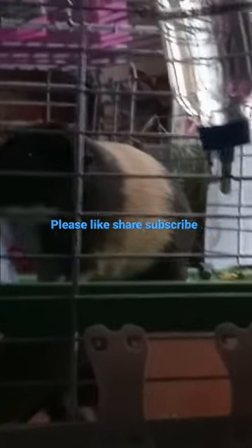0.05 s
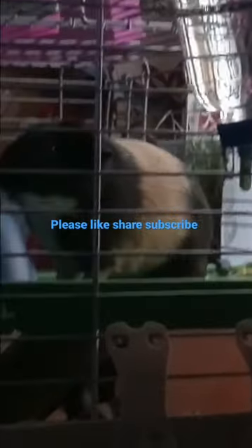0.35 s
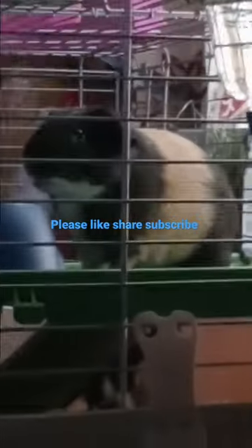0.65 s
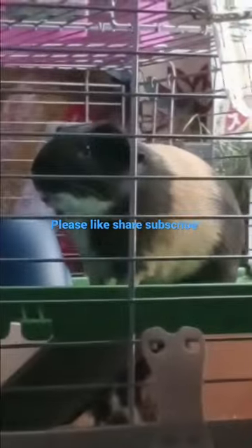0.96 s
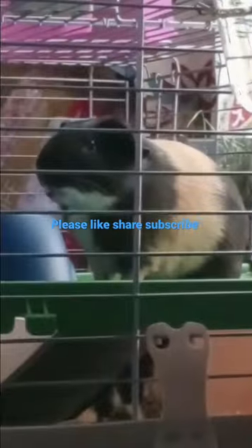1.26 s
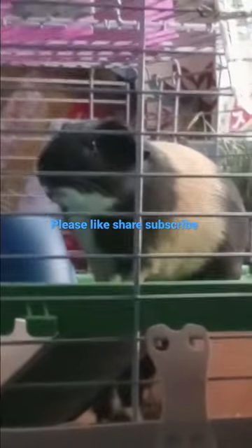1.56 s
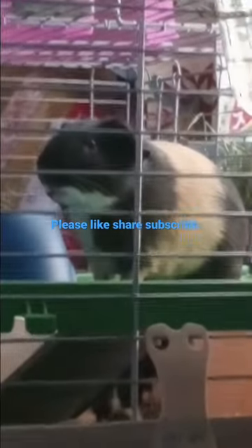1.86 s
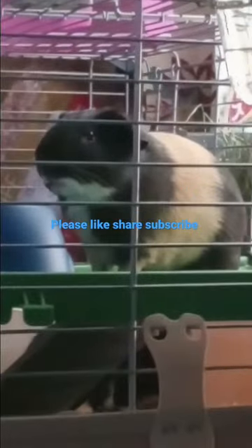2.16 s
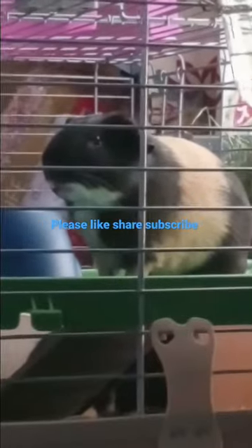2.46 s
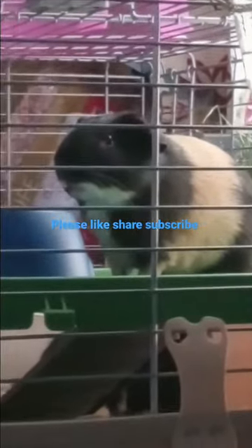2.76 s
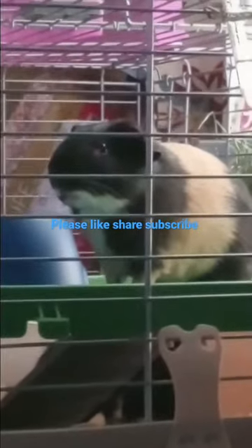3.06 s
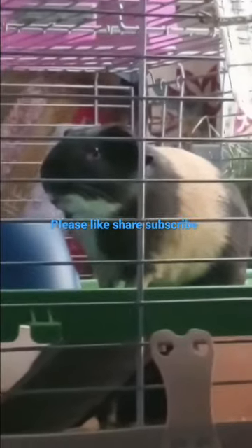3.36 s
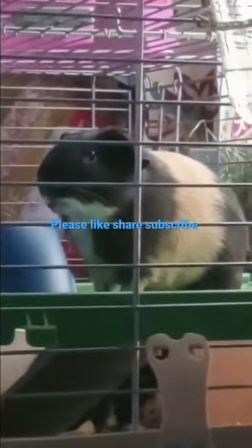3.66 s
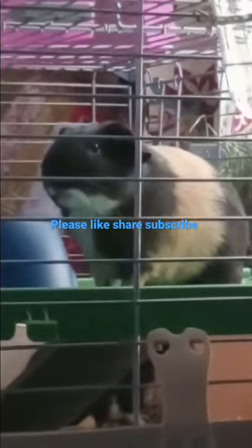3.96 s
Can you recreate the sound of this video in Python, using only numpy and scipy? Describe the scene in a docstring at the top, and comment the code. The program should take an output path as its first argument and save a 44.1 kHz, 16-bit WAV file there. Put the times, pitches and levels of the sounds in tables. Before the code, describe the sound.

A guinea pig squeals sharply and goes on squeaking quietly in a small room. Quick, ringing cage clacks and a light rustle sound close by, then stop, leaving fading squeaks and a few soft microphone bumps.

```python
"""A guinea pig in a wire cage in a small room: one loud squeal, then soft rising squeaks that die away.
Each call is a nearly pure whistle from the throat, with weak overtones and a short room echo.
Close by on the left come ten sharp clacks, about six a second: clusters of tiny hard contacts
that leave the cage wires ringing. Bedding rustles in fine grains, over faint hiss,
a low rumble, a wavering hum and a few soft handling bumps."""
import sys
import numpy as np
from scipy import signal
from scipy.fft import rfft, irfft
from scipy.io import wavfile
from scipy.ndimage import uniform_filter1d, minimum_filter1d

SR = 44100
rng = np.random.default_rng(int(sys.argv[2]) if len(sys.argv) > 2 else 0)


def inscribe(sig):
    """Save sig as 16-bit PCM at rate SR to the path in sys.argv[1].

    A 1-D sig is mono; a 2-D sig holds one channel per row.
    Samples are clipped to [-1, 1] before scaling.
    """
    pcm = np.round(np.clip(np.atleast_2d(sig).T, -1, 1) * 32767)
    wavfile.write(sys.argv[1], SR, pcm.astype(np.int16))


N = 176400
T = np.arange(N) / SR
ROOM_T60_S, ROOM_BUILD_S, RIGHT_LEAD_S = .16, .0048, .00107


def amp(db):
    return 10 ** (np.asarray(db) / 20)


def unit(x):
    return x / np.sqrt(np.mean(x ** 2))


def curve_db(points, f):
    """Read an EQ curve on a log-frequency axis."""
    hz, db = np.array(points).T
    return np.interp(np.log(f + 1), np.log(hz), db)


def colour(x, points):
    """Play a sound through an EQ curve."""
    return irfft(rfft(x, 2 * N) * amp(curve_db(points, np.linspace(0, SR / 2, N + 1))))[:N]


def noise(points):
    return unit(colour(rng.standard_normal(N), points))


def wobble(rate):
    """Smooth random modulation with a spread near 1."""
    k = int(SR / rate)
    return unit(uniform_filter1d(np.repeat(rng.standard_normal(N // k + 1), k), k)[:N])


def tap_response(db):
    """How a body with this spectrum rings when tapped (minimum phase)."""
    cepstrum = irfft(db * np.log(10) / 20)
    cepstrum[1:len(cepstrum) // 2] *= 2
    cepstrum[len(cepstrum) // 2 + 1:] = 0
    return irfft(np.exp(rfft(cepstrum)))


def room(x, wet_db, t60=ROOM_T60_S):
    """The small room's diffuse tail, wet only."""
    t = T[:SR // 2]
    tail = rng.standard_normal(len(t)) * np.exp(-np.log(1000) * t / t60)
    tail *= 1 - np.exp(-(t / ROOM_BUILD_S) ** 2)
    return amp(wet_db) * signal.fftconvolve(x, tail / np.linalg.norm(tail))[:N]


def early(x):
    """Sound reaches the right side a little sooner."""
    return np.interp(T + RIGHT_LEAD_S, T, x, right=0)


def in_room(pair, wet_db, t60=ROOM_T60_S):
    """A stereo call plus its echo, slightly drier on the right."""
    left, right = pair
    return np.array([left + room(left, wet_db, t60), early(right) + room(right, wet_db - 1.5, t60)])


def whistle(pitch, gain, partials):
    """The throat's tone: sine harmonics, each with a left and a right level in dB."""
    phase = 2 * np.pi * np.cumsum(pitch) / SR
    tone = sum(amp(sides).reshape(2, -1) * np.sin(k * phase) for k, sides in enumerate(partials, 1))
    return tone * gain * np.sqrt(2)


# The squeal's contour. Each row: time in seconds, pitch in Hz, level in dB.
SQUEAL_CONTOUR = [(0, 2980, -51.5), (.016, 3268, -52), (.026, 3447, -31.5), (0.043, 3613, -29.5),
                  (.049, 3800, -43.5), (0.061, 3782, -21), (.084, 3910, -13), (.097, 4010, -22),
                  (0.117, 4162, -24), (.128, 4058, -36), (.16, 3720, -62.5)]
# Its harmonics, from the fundamental up. Each row: left gain in dB, right gain in dB.
SQUEAL_PARTIALS = [(0.5, -14), (-24.5, -25.5), (-54, -47.5)]


def squeal():
    """One loud, high call that climbs and breaks off."""
    times, hz, db = np.array(SQUEAL_CONTOUR).T
    pitch = np.interp(T, times, hz) * (1 + .0014 * wobble(200))
    gain = amp(np.interp(T, times, db)) * (T < times[-1])
    return in_room(whistle(pitch, gain, SQUEAL_PARTIALS), wet_db=-5, t60=.22)


# The throat's EQ on the overtones of soft calls. Each row: frequency in Hz, gain in dB.
THROAT_EQ = [(1450, -5), (1900, -33.5), (3200, 0), (3800, -22.5), (4400, -44)]


def soft_voice(pitch, gain, fall_db=-19, right_db=-7):
    """The quiet voice: three overtones, rolled off in steps and coloured by the throat."""
    overtones = [curve_db(THROAT_EQ, (k + 2) * pitch) + k * fall_db for k in range(3)]
    return whistle(pitch, gain, [(db, db + right_db) for db in [np.zeros(N)] + overtones])


# The shape all squeaks share. Each row: seconds from mid-sweep, pitch in Hz, gain in dB.
SQUEAK_SHAPE = [(-.08, 781, -6.5), (-.04, 792.6, 3), (-.018, 905.6, -2.5), (0, 1154, -3),
                (0.023, 1500, -11), (0.058, 1767, -17), (.105, 2068, -10.5)]
# The squeaks. Each row: mid-sweep time in seconds, seconds before it, seconds after it,
# time stretch of the shape, low-note level in dB, sweep level in dB.
SQUEAKS = [(0.389, 0.025, .16, 1.7, -54, -44.5), (.763, 0.055, 0.075, 1.19, -47.5, -45.5),
           (1.12, .07, 0.077, 1.24, -52.5, -44.5), (1.441, .13, 0.078, 0.93, -58.5, -45.5),
           (1.819, 0.083, 0.11, 1.1, -54, -45), (2.177, 0.064, 0.019, 0.87, -53.5, -47),
           (2.506, 0.062, 0.0095, 1.1, -67.5, -66), (2.602, 0.085, 0.017, 1.1, -58.5, -47),
           (3.023, 0.088, .008, 1.22, -65, -68), (3.32, 0.041, .004, 1.62, -57.5, -53.5),
           (3.616, 0.07, 0.0027, 1.28, -60.5, -54.5)]


def squeaks(fade_s=.0092, flutter_db=3, rasp_depth=.035):
    """Each soft call opens on a low note, then sweeps up, fluttering, until the animal stops."""
    times, hz, db = np.array(SQUEAK_SHAPE).T
    pitch, gain = np.full(N, hz[0], float), np.zeros(N)
    flutter = flutter_db * wobble(130)
    rasp = rasp_depth * wobble(400)
    for at, before, after, stretch, low_db, sweep_db in SQUEAKS:
        on = (T > at - before) & (T < at + after)
        t = T[on] - at
        fade = np.sin(np.pi / 2 * np.clip(np.minimum(t + before, after - t) / fade_s, 0, 1)) ** 2
        climbing = np.interp(t / stretch, times[1:3], [0, 1])
        pitch[on] = np.interp(t / stretch, times, hz) * (1 + climbing * rasp[on])
        level_db = low_db + climbing * (sweep_db - low_db + flutter[on])
        gain[on] = fade * amp(np.interp(t / stretch, times, db) + level_db)
    return in_room(soft_voice(pitch, gain), wet_db=3)


# Steady peeps. Each row: start in seconds, length in seconds, pitch in Hz, level in dB.
PEEPS = [(.292, .067, 706.3, -36.5), (.44, .07, 1707, -49), (1.84, .075, 3050, -57)]


def peeps():
    """Short, clean calls that swell and fade on one pitch."""
    pitch, gain = np.ones(N), np.zeros(N)
    for at, length, hz, db in PEEPS:
        on = (T > at) & (T < at + length)
        pitch[on] = hz
        gain[on] = amp(db) * np.sin(np.pi * (T[on] - at) / length)
    return in_room(soft_voice(pitch, gain), wet_db=-11)


# The faint last squeak. Each row: time in seconds, pitch in Hz, level in dB.
WHEEZE_CONTOUR = [(3.7, 1950, -81.5), (3.93, 3140, -71)]


def wheeze():
    """A scratchy rising call, heard only by way of the room."""
    times, hz, db = np.array(WHEEZE_CONTOUR).T
    pitch = np.interp(T, times, hz) * (1 + .09 * wobble(500))
    gain = amp(np.interp(T, times, db)) * (T > times[0])
    return np.array([room(side, wet_db=0) for side in soft_voice(pitch, gain)])


# The base tone of a hard contact. Each row: frequency in Hz, gain in dB.
CONTACT_EQ = [(100, -50), (330, -31), (680, -16.5), (1050, -18), (1950, -7.5), (2500, -11.5), (3500, -7.5),
              (4400, -10), (6200, -17.5), (8000, -32), (11000, -55), (15500, -61)]


def struck_body(size, ring_hz, chatter_hz, hollow_db, treble_db):
    """One tap on a hard, quickly damped body; fast chatter combs its spectrum."""
    f = np.linspace(1, SR / 2, size // 2 + 1)
    resonance = 11 / (1 + ((f - ring_hz) / 495) ** 4)
    hollow = hollow_db * np.exp(-(np.log2(f / 1380) / .75) ** 2)
    shelf = treble_db * f ** 4 / (f ** 4 + 5830 ** 4)
    comb = 5 * np.cos(2 * np.pi * (f - ring_hz) / chatter_hz)
    return tap_response(curve_db(CONTACT_EQ, f) + resonance + hollow + shelf + comb)


# The clacks. Each row: start in seconds, level in dB, gap to the second snap in seconds,
# second snap and crackle in dB against the first snap, ring in Hz, chatter rate in Hz,
# hollow boost in dB, treble shelf in dB, wire level in dB.
CLACKS = [(0.033, -25, 0.0029, -7, 4.5, 3430, 1664, -5.5, -2, -49),
          (.196, -27, 0.0021, 2, 9, 3130, 557, -5.5, -11, -47.5),
          (0.378, -24, .0025, -3, -2, 3323, 803, -9.5, 1, -45),
          (0.5562, -26, .0054, 11, 11.5, 3230, 672, 3, -3, -32),
          (0.723, -25, 0.007, 5, 11, 3410, 635, 13, 18, -49),
          (0.8739, -25.5, 0.0045, -2, 8.5, 3304, 655, 17, 22, -54),
          (1.043, -23.5, 0.001586, 1, 10.5, 3332, 689, -1, 0, -45),
          (1.2069, -23.5, 0.0052, -0.5, -3, 3460, 637, 5.5, 2, -38.5),
          (1.366, -24.5, 0.0048, 5.5, 9, 3222, 485, 1.5, 4.5, -39),
          (1.5658, -23, 0.0044, 1.5, 4, 3187, 734, -0.5, -10, -47)]
# The far, right side's EQ for clacks and rustle. Each row: frequency in Hz, gain in dB.
FAR_SIDE_EQ = [(600, -6), (1300, -19.5), (2400, -21.5), (4400, -16), (6500, -13.5), (8200, 4), (10500, 6.5),
               (15000, 7.5)]


def clacks(contacts_per_s=2000, spread_db=4, rise_s=.002, decay_s=.0036):
    """Two snaps amid a crackle of tiny contacts strike a hard body; wires and room ring on."""
    size, lead = 2048, 256  # samples in a clack, and ahead of its first snap
    t = (np.arange(size) - lead) / SR
    out = np.zeros(N)
    for at, db, gap, second_db, crackle_db, ring_hz, chatter_hz, hollow_db, treble_db, wire_db in CLACKS:
        swell = np.exp(np.minimum(t, 0) / rise_s - np.maximum(t - gap, 0) / decay_s)
        taps = (rng.random(size) < contacts_per_s / SR) * rng.choice([-1, 1], size)
        taps = taps * amp(spread_db * rng.standard_normal(size)) * swell
        taps *= amp(crackle_db) / np.linalg.norm(taps)
        taps[lead] += 1
        taps[lead + int(gap * SR)] += amp(second_db)
        body = struck_body(size, ring_hz, chatter_hz, hollow_db, treble_db)
        start = int(at * SR) - lead
        out[start:start + size] += amp(db) * unit(signal.fftconvolve(taps, body)[:size])
        out[start + lead:start + lead + SR // 2] += amp(wire_db) * wires()
    left = out + room(out, wet_db=-13.5)
    right = early(out) + room(out, wet_db=-9)
    return np.array([left, colour(right, FAR_SIDE_EQ)])


# The tones of the cage wires. Each row: frequency in Hz, relative level in dB.
WIRE_MODES = [(2272, -2), (2950, -1), (3585, 0), (4080, -3)]


def wires(t60=.3):
    """Thin steel bars ring in beating pairs, in a new mix after every clack."""
    t = T[:SR // 2]
    hz, db = np.array(WIRE_MODES * 2).T[:, :, None]
    detune, scatter, phase = rng.standard_normal((3,) + hz.shape)
    tones = amp(db + 3.5 * scatter) * np.sin(2 * np.pi * (hz * (1 + .025 * detune) * t + phase))
    return unit(tones.sum(axis=0)) * np.exp(-np.log(1000) * t / t60)


# The bedding's swells. Each row: time in seconds, level in dB.
RUSTLE_ENVELOPE = [(0, -59), (.45, -61.5), (.552, -54.5), (.575, -39), (.72, -40.5), (.88, -49),
                   (1.02, -53), (1.15, -67), (1.31, -65), (1.40, -50), (1.55, -54.5), (1.62, -48.5),
                   (1.70, -60), (2.25, -65.5), (2.258, -53.5), (2.285, -69), (3.6, -80)]
# Its dry, bright tone. Each row: frequency in Hz, gain in dB.
RUSTLE_EQ = [(300, -18.5), (1500, -7.5), (3000, 1), (4500, -1), (6300, 1), (7800, -17), (10000, -18),
             (12000, -42.5), (15000, -29.5)]


def rustle(grain_db=1.5):
    """Dense fine grains of shifting bedding."""
    level = amp(np.interp(T, *np.array(RUSTLE_ENVELOPE).T) + .36 * wobble(28))
    grains = [rng.standard_normal(N) * amp(grain_db * wobble(1100)) for _ in range(2)]
    near, far = (unit(colour(side, RUSTLE_EQ)) for side in grains)
    right = amp(-2.5) * colour(.3 * early(near) + 2.1 * far, FAR_SIDE_EQ)
    return level * np.array([near, right])


# The tone of the hiss. Each row: frequency in Hz, gain in dB.
HISS_EQ = [(110, -9.5), (344, 0), (495, -9.5), (1310, -12.5), (2240, -9.5), (6070, -26.5), (11000, -37)]
# Its extra EQ on the right. Each row: frequency in Hz, gain in dB.
HISS_RIGHT_EQ = [(700, -9), (2400, -18), (4400, -11), (8000, -9.5), (14000, 2.5)]


def hiss(level_db=-67):
    """A faint bed of air, partly shared by the two sides."""
    left = noise(HISS_EQ)
    right = colour(.7 * early(left) + .81 * noise(HISS_EQ), HISS_RIGHT_EQ)
    return amp(level_db) * np.array([left, right])


# Handling bumps. Each row: centre in seconds, envelope peak in dB.
BUMPS = [(1.285, -51), (2.661, -49), (2.756, -50.5), (3.059, -42.5), (3.124, -46.5)]


def bumps(hz=67, width_s=.026):
    """Soft handling thuds: a few low cycles that swell and die."""
    return sum(amp(db) * np.exp(-((T - at) / width_s) ** 2) * np.sin(2 * np.pi * hz * (T - at))
               for at, db in BUMPS)


def hum(hz=94, level_db=-65.5):
    """A low tone that wavers in level and pitch."""
    gain = amp(level_db + 5.8 * wobble(12))
    pitch = hz + 2 * wobble(21)
    return gain * np.sin(2 * np.pi * np.cumsum(pitch) / SR)


# The tone of the rumble. Each row: frequency in Hz, gain in dB.
RUMBLE_EQ = [(20, -18), (42, -16), (62, 1), (110, -8.5), (160, -19.5), (1500, -98.5)]


def rumble(level_db=-65):
    """Steady deep noise under everything."""
    return amp(level_db) * noise(RUMBLE_EQ)


def scene():
    """The cage sounds over the hiss, with the low end leaning left."""
    mix = clacks() + squeal() + peeps() + squeaks() + wheeze() + rustle() + hiss()
    low_end = hum() + rumble() + bumps()
    return mix + low_end * amp([[0], [-9]])


def record(dry, limit_db=-5, top_hz=15800):
    """A limiter catches the sharpest peaks, then a steep low-pass cuts the top."""
    gain = np.minimum(1, amp(limit_db) / (np.abs(dry).max(axis=0) + 1e-9))
    gain = uniform_filter1d(minimum_filter1d(gain, size=65), size=65)
    return signal.sosfilt(signal.ellip(8, .2, 70, top_hz, fs=SR, output="sos"), dry * gain)


dry = scene()
out = record(dry)
inscribe(out)
```